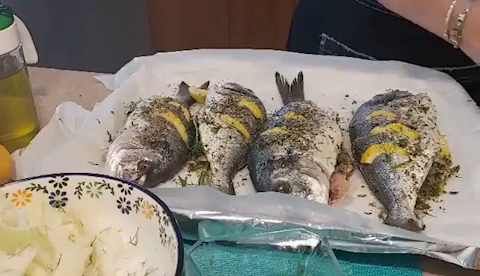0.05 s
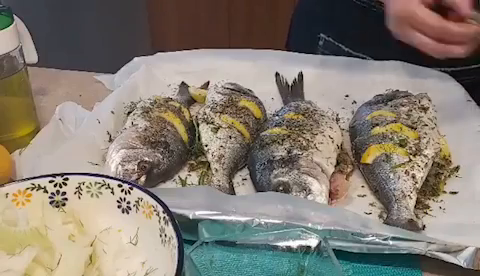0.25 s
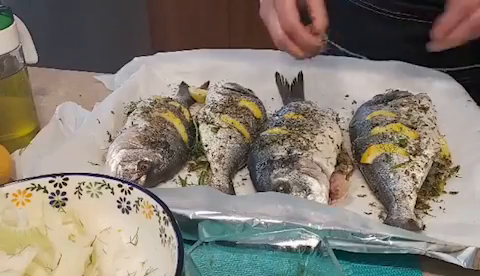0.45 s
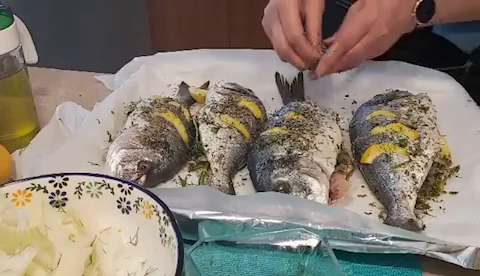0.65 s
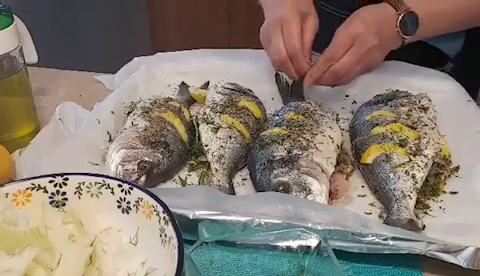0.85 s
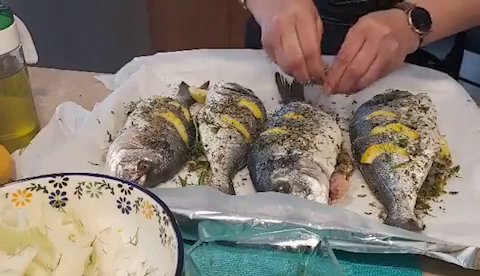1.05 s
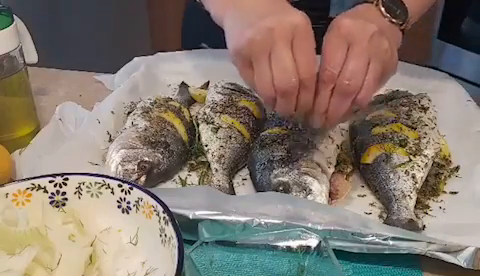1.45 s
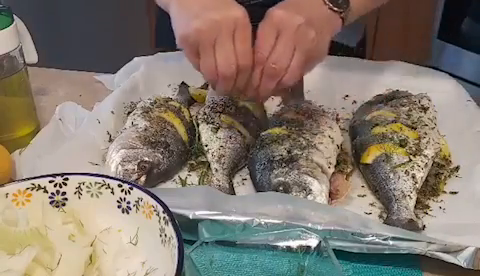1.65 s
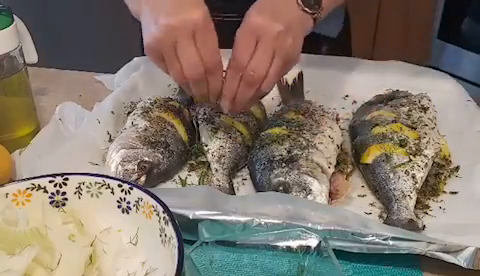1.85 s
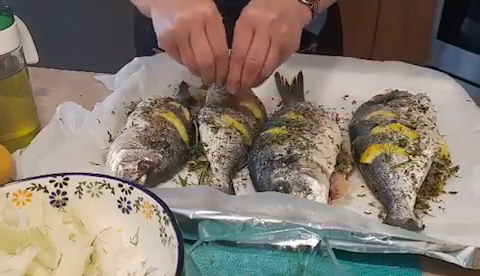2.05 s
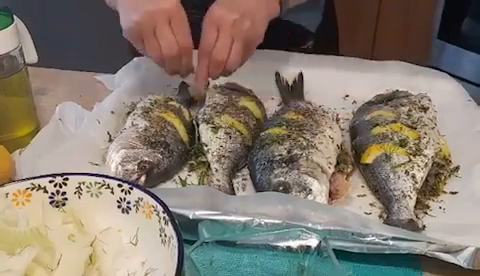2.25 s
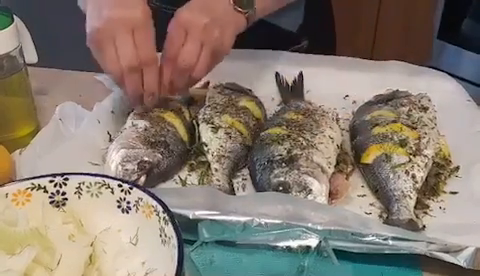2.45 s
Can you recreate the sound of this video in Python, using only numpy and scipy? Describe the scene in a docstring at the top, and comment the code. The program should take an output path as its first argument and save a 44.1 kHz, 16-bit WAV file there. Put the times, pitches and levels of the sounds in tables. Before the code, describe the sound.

Fingers rubbing and crumbling dry seasoning with a soft, crisp crackle and tiny snaps.

```python
"""Rubbing dry seasoning over a tray

Close by in a kitchen, fingers rub a pinch of dry seasoning, and tiny crumbs break in a fizz.
Under harder pinches, bigger flakes crunch and stalks snap.
Behind them are a soft rush and a faint appliance hum, which swells and sinks as if a noise
suppressor were opening and closing. Fizz and rush have a gap near 3 kHz, as from audio compression."""
import sys
import numpy as np
from scipy import signal
from scipy.io import wavfile
from scipy.ndimage import uniform_filter1d

SR = 44100
rng = np.random.default_rng(int(sys.argv[2]) if len(sys.argv) > 2 else 0)


def store_wav(level_fs):
    """Save 16-bit WAV to argv[1]."""
    pcm = np.round(np.clip(np.atleast_2d(level_fs), -1, 1) * 32767)
    wavfile.write(sys.argv[1], SR, pcm.T.astype(np.int16))


N = 110250
T = np.arange(N) / SR
TOP_HZ = 13120  # upper edge of the sound

# Levels compare rows within a table; the functions may turn a whole layer up or down.
# How hard the fingers rub, heard as the loudness of the fizz: time_s, level_db
RUB_EFFORT = [(0, -60.5), (.105, -65.5), (.125, -62.5), (.165, -58.5), (.195, -58), (.222, -63.5),
              (.255, -51), (.335, -46.5), (.365, -49.5), (.412, -45.5), (.435, -51.5), (.49, -47.5),
              (.555, -48), (.582, -54.5), (.597, -49.5), (.64, -51.5), (.685, -39), (.705, -43),
              (.815, -45), (.865, -38), (.95, -43.5), (1.01, -47), (1.08, -46), (1.18, -51), (1.22, -45),
              (1.28, -45.5), (1.335, -55), (1.375, -45), (1.44, -45.5), (1.485, -39), (1.535, -43.5),
              (1.605, -51.5), (1.655, -44), (1.72, -48), (1.805, -55.5), (1.865, -48.5), (1.955, -44.5),
              (2.02, -55.5), (2.06, -48.5), (2.1, -54), (2.16, -62.5), (2.235, -49), (2.29, -52),
              (2.345, -64), (2.375, -55.5), (2.41, -55), (2.445, -68), (2.475, -58)]
# Finer crumbs sound brighter: time_s, tilt_db_per_octave
FIZZ_BRIGHTNESS = [(0, 7), (.3, 2), (.55, 0.5), (.7, -1), (.86, 1), (.96, -1.5), (1.08, 2.5), (1.25, 2),
                   (1.5, -4.5), (1.62, -1), (1.85, -1.5), (1.98, -2.5), (2.23, -0.5), (2.5, -6)]
# Tone of the bright fizz, with a deep gap near 3 kHz as from audio compression: frequency_hz, level_db
FIZZ_TONE = [(200, -27.5), (700, -31.5), (1800, -22), (2450, -27.5), (2900, -31), (3350, -68.5),
             (3800, -23), (4300, -13.5), (5600, -11), (7600, -3.5), (9300, -5.5), (10800, -1), (12300, 4),
             (13200, -0.5)]
# Tone of skin brushing skin: frequency_hz, level_db
SKIN_TONE = [(40, -20), (100, -3), (300, -4), (500, 0), (1000, -10), (2000, -6), (13000, -69)]
# Loudness of big flakes crunching: time_s, level_db
CRUNCH_LEVEL = [(0, -84.5), (.5, -99), (.64, -62), (.66, -55.5), (.72, -65), (.76, -61.5), (.81, -69),
                (.89, -60), (.92, -54), (.955, -57), (1.04, -52), (1.11, -58.5), (1.22, -76), (1.26, -63),
                (1.34, -87.5), (1.39, -65.5), (1.49, -62.5), (1.54, -52), (1.575, -57.5), (1.615, -56.5),
                (1.66, -57), (1.73, -60.5), (1.79, -82), (1.88, -70.5), (1.96, -63.5), (1.985, -57.5),
                (2.03, -73), (2.08, -71), (2.16, -82.5), (2.24, -78), (2.33, -86)]
# Tone of big flakes breaking: frequency_hz, level_db
CRUNCH_TONE = [(200, -55), (700, -14.5), (1400, -14), (1800, -6), (2400, 4.5), (3300, -7.5), (4300, 2),
               (5600, -5.5), (8000, 0.5), (13000, -21.5)]
# Whole flakes collapsing: start_s, length_s, level_db, pitch_hz, width_share_of_pitch
FLAKE_CRUSHES = [(.439, 0.023, -58.5, 4500, 0.2), (0.515, 0.033, -58, 4130, 0.2),
                 (0.8963, 0.042, -46, 2930, .8), (1.029, 0.034, -54, 2070, 0.34),
                 (1.474, 0.065, -60, 2230, 0.31), (1.57, 0.051, -56.5, 2700, 0.46),
                 (1.648, 0.048, -57.5, 2670, 0.16), (1.976, 0.087, -66.5, 1680, 0.26)]
# Stalks snapping: start_s, tick_db, crack_db, crack_pitch_hz
STALK_SNAPS = [(0.1152, -59.5, -97, 4400), (0.124, -47.5, -91, 4380), (.229, -42.5, -89, 4840),
               (0.2745, -43, -90, 4350), (0.415, -49, -67, 4400), (0.5999, -38, -49, 2610),
               (0.654, -50, -58, 2570), (0.6777, -33, -67, 1960), (0.6857, -42.5, -62, 2120),
               (0.9014, -36, -52, 3540), (0.9296, -44, -64, 3800), (0.9592, -42.5, -49, 4100),
               (0.981, -37, -49, 3700), (1.008, -36, -46.5, 4100), (1.0526, -43, -52, 2940),
               (1.07, -39, -54, 2760), (1.4618, -61, -75, 4600), (1.48, -55, -65, 4500),
               (1.533, -45, -74, 4500), (1.55, -37, -40, 4730), (1.5957, -40.5, -47, 4700),
               (1.6347, -55, -48, 5000), (1.6586, -48, -52, 2700), (1.915, -43, -78, 4530),
               (1.945, -47, -49.5, 4800), (1.974, -48, -50, 1840), (2.239, -44.5, -62, 4700)]
# Dull knocks under the fingers: start_s, level_db, pitch_hz, decay_s
FINGER_KNOCKS = [(.672, -79.5, 384, 0.0087), (1.5505, -59, 1040, 0.0015), (1.951, -85, 405, 0.016),
                 (1.9723, -64, 1420, 0.0011), (2.051, -77, 1000, 0.0034)]
# Loudness of the low hum, rising and falling as a noise suppressor opens and closes: time_s, level_db
HUM_LEVEL = [(0.0, -106), (0.07, -88), (0.97, -64.5), (1.57, -67), (1.79, -73.5), (1.84, -81), (2.42, -77),
             (2.5, -102)]
# Loudness of the soft background rush: time_s, level_db
RUSH_LEVEL = [(0, -78), (.4, -75), (1.0, -72.5), (1.6, -73), (2.5, -78.5)]
# Tone of the soft background rush, with a gap near 3 kHz as from audio compression:
# frequency_hz, level_db
RUSH_TONE = [(20, -44.5), (55, 6.5), (110, 4), (165, 6.5), (190, -2), (230, 5), (350, 0.5), (500, -5.5),
             (1500, -11.5), (3000, -44), (13000, -12)]


def rubbing():
    """Crumbs break, grit slides and larger flecks click, over the dull brush of skin on skin."""
    slide_share = 0.42  # the part of the grit's power that is smooth hiss
    crumbs = tiny_breaks(per_s=4500, spread_db=1, ring_s=.0005, top_hz=TOP_HZ)
    grit = np.sqrt(1 - slide_share) * crumbs + np.sqrt(slide_share) * rng.standard_normal(N)
    flecks = amp(-10.5) * unit(clicks(per_s=300, spread_db=1.5))
    fizz = shape_tone(grit + flecks, FIZZ_TONE)
    fizz = amp(-0.03) * drift_tone(fizz, depth_db=3, brightness=FIZZ_BRIGHTNESS)
    skin = amp(-37.5) * shape_tone(rng.standard_normal(N), SKIN_TONE)
    return (fizz + skin) * level(RUB_EFFORT) * uneven_grip(depth_db=-0.08)


def crunching():
    """Bigger flakes break in fewer, lower clicks that come in bunches."""
    breaks = tiny_breaks(per_s=2900, spread_db=2, ring_s=.0008, top_hz=8410)
    crunch = shape_tone(breaks * uneven_grip(depth_db=-3), CRUNCH_TONE)
    return amp(1.5) * drift_tone(crunch, depth_db=4) * level(CRUNCH_LEVEL)


def crushing(rise_s=0.0019):
    """A whole flake gives way at once, and its crackle dies out."""
    out = np.zeros(N)
    for start_s, length_s, db, hz, width in FLAKE_CRUSHES:
        t = T[T < length_s]
        crackle = resonance(clicks(per_s=1400, spread_db=2)[:len(t)], hz, width)
        fade = np.minimum(t / rise_s, 1) * (1 - t / length_s)
        add(out, start_s, amp(db + 1) * fade * crackle)
    return out


def snapping():
    """Each stalk snaps with a bright tick and a lower crack."""
    ticks, cracks = np.zeros((2, N))
    for start_s, tick_db, crack_db, hz in STALK_SNAPS:
        add(ticks, start_s, amp(tick_db + 9) * burst(decay_s=.0012))
        add(cracks, start_s, amp(crack_db + 7) * burst(decay_s=.0014, hz=hz, width=.48))
    return shape_tone(ticks, FIZZ_TONE) + cracks


def knocking():
    """Now and then the fingers make a dull knock."""
    out = np.zeros(N)
    for start_s, db, hz, decay_s in FINGER_KNOCKS:
        add(out, start_s, amp(db + 16) * burst(decay_s, hz, width=.62))
    return out


def tiny_breaks(per_s, spread_db, ring_s, top_hz, pitches=40):
    """Crumbs break at random; each rings briefly at one of many pitches."""
    breaks = clicks(per_s, spread_db)
    pitch_choice = rng.integers(0, pitches, N)
    t, out = T[:SR // 100], np.zeros(N)
    for k, (offset, phase) in enumerate(rng.random((pitches, 2))):
        hz = top_hz * (k + offset) / pitches
        ring = np.exp(-t / ring_s) * np.sin(2 * np.pi * (hz * t + phase))
        out += signal.oaconvolve(breaks * (pitch_choice == k), ring)[:N]
    return unit(out)


def clicks(per_s, spread_db):
    """Clicks at random times, most small and a few large."""
    size = amp(spread_db * np.minimum(rng.exponential(1, N), 4))
    return size * rng.choice([-1., 1.], N) * (rng.random(N) < per_s / SR)


def burst(decay_s, hz=None, width=None, rise_s=.0005):
    """A quick burst of noise, as when fibres give way; it centres on a pitch if given one."""
    t = T[:SR // 40]
    force = (1 - np.exp(-t / rise_s)) * np.exp(-t / decay_s) * rng.choice([-1., 1.], len(t))
    return force if hz is None else resonance(force, hz, width) * force.std()


def uneven_grip(depth_db, bunch_s=0.0045, steady_s=.02):
    """An uneven grip makes the loudness flutter quickly but even out over longer times."""
    carry_over = np.exp(-1 / (bunch_s * SR))
    grip = signal.lfilter([1], [1, -carry_over], rng.standard_normal(N))
    grip -= uniform_filter1d(grip, round(steady_s * SR))
    return unit(amp(depth_db * unit(grip)))


def drift_tone(x, depth_db, brightness=None, patch_s=0.01, patch_hz=122):
    """The tone drifts in small patches as crumbs and fingers move; brightness tilts the treble."""
    hz, t, spectrum = signal.stft(x, SR, nperseg=512, noverlap=384)
    # Blur random values across pitch and time to make smooth patches.
    per_hz = np.fft.fftfreq(len(hz), hz[1])[:, None]
    per_s = np.fft.fftfreq(len(t), t[1])
    blur = np.exp(-2 * np.pi ** 2 * ((per_hz * patch_hz) ** 2 + (per_s * patch_s) ** 2))
    patches = np.fft.ifft2(np.fft.fft2(rng.standard_normal(spectrum.shape)) * blur).real
    db = depth_db * unit(patches)
    if brightness is not None:
        octaves = np.log2(np.maximum(hz, 2500) / 9200)  # the tilt pivots at 9200 Hz
        db += np.interp(t, *np.transpose(brightness)) * octaves[:, None]
    _, drifted = signal.istft(spectrum * amp(db), SR, nperseg=512, noverlap=384)
    return unit(drifted[:N])


def resonance(x, hz, width):
    """Keeps one band around a pitch; width is a share of that pitch."""
    band = np.clip(hz * np.exp([-width / 2, width / 2]), 1, TOP_HZ)
    return unit(signal.sosfilt(signal.butter(3, band, "bandpass", fs=SR, output="sos"), x))


def shape_tone(x, tone, size=2048):
    """Filters a sound to follow a tone table, keeping noise about as strong as before."""
    hz, db = np.transpose(tone)
    grid_hz = abs(np.fft.fftfreq(size, 1 / SR))
    log_gain = np.log(amp(np.interp(np.log(grid_hz + 1), np.log(hz), db)))
    # This filter rings only after a click, never before it.
    taps = np.fft.ifft(np.exp(np.conj(signal.hilbert(log_gain)))).real
    power = np.mean(np.exp(2 * log_gain) * (grid_hz < TOP_HZ))
    return signal.fftconvolve(x, taps / np.sqrt(power))[:N]


def amp(db):
    """Turns decibels into a multiplier."""
    return 10 ** (np.asarray(db) / 20)


def unit(x):
    """Scales a signal to an average power of 1."""
    return x / np.sqrt(np.mean(x ** 2) + 1e-20)


def level(curve):
    """Joins time_s, level_db points into a multiplier for every sample."""
    return amp(np.interp(T, *np.transpose(curve)))


def add(mix, start_s, sound):
    """Mixes a sound in at its start time."""
    span = mix[round(start_s * SR):][:len(sound)]
    span += sound[:len(span)]


def kitchen_echo(x, bounce_s=.00345, tail_s=.1):
    """The tray, counter and walls add one early bounce and a short, faint echo."""
    t = T[:SR // 2]
    tail = rng.standard_normal(len(t)) * amp(-60 * t / tail_s)
    echo = signal.fftconvolve(x, tail / np.linalg.norm(tail))[:N]
    bounce = np.pad(x, (round(bounce_s * SR), 0))[:N]
    return x + amp(-12.5) * bounce + amp(-10) * echo


def appliance_hum(pitch_hz=80.4):
    """One low note from an appliance, fading in and out as if through a noise suppressor."""
    return np.sqrt(2) * np.sin(2 * np.pi * (pitch_hz * T + rng.random())) * level(HUM_LEVEL)


def background_rush():
    """Soft, low room noise that swells and sinks."""
    return shape_tone(rng.standard_normal(N), RUSH_TONE) * level(RUSH_LEVEL)


def scene():
    """The hands at work in the kitchen, with hum and rush behind them, in one channel."""
    hands = rubbing() + crunching() + crushing() + snapping() + knocking()
    return (kitchen_echo(hands) + appliance_hum() + background_rush())[None]


def record(dry):
    """Cuts away the treble above TOP_HZ."""
    low_pass = signal.firwin(401, TOP_HZ, window=("kaiser", 8), fs=SR)
    return signal.oaconvolve(dry, low_pass[None], "same")


dry = scene()
out = record(dry)
store_wav(out)
```